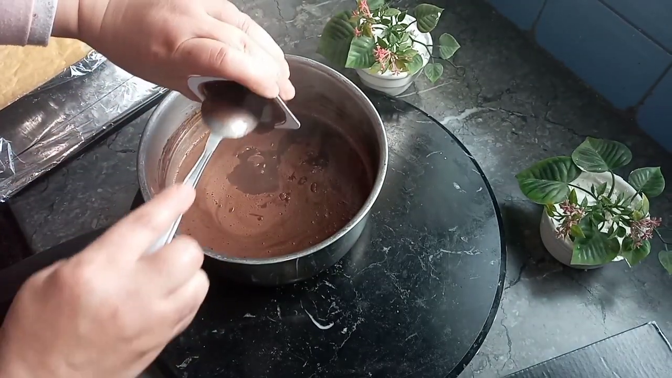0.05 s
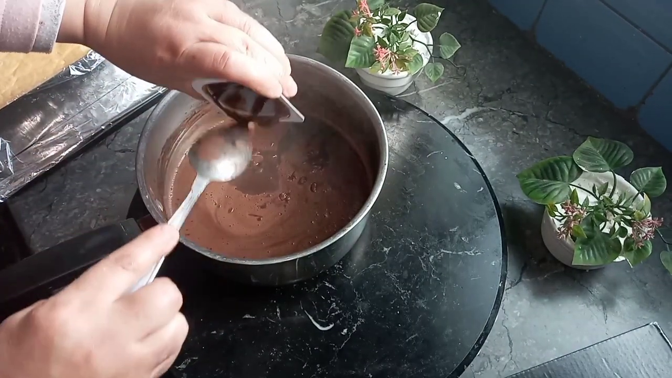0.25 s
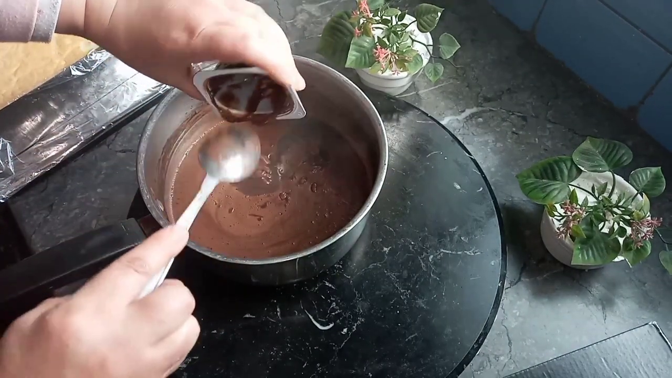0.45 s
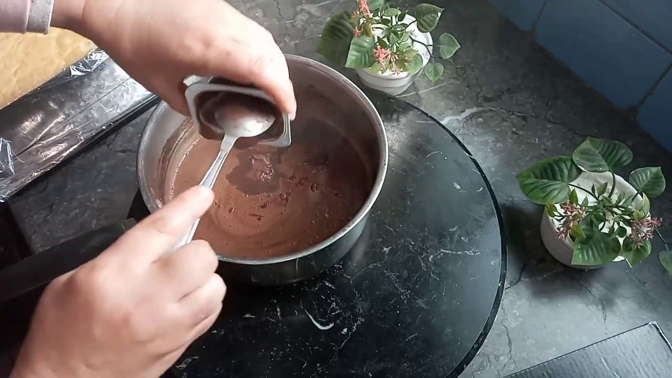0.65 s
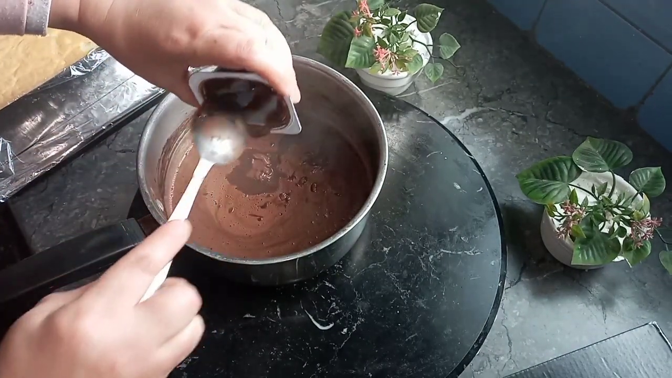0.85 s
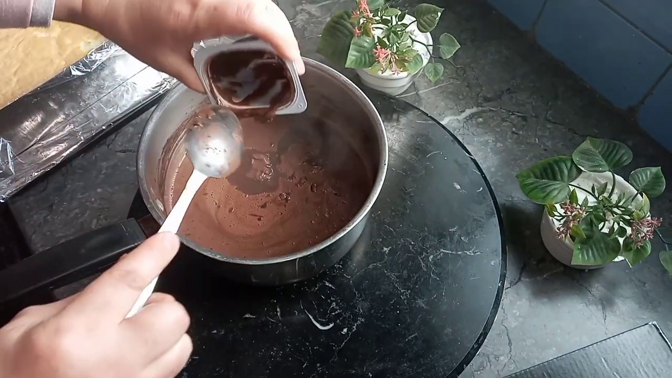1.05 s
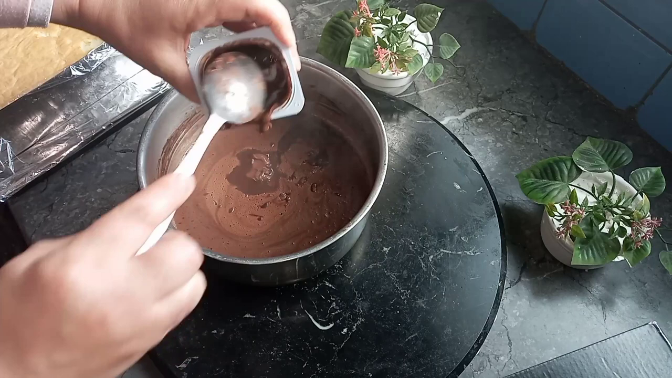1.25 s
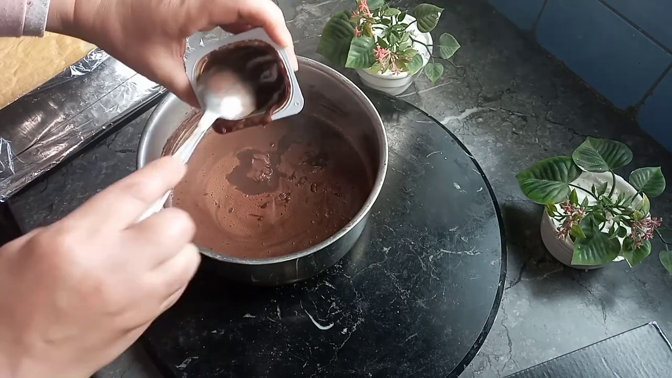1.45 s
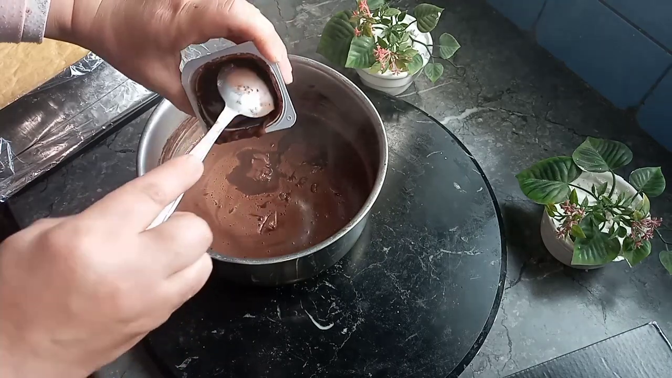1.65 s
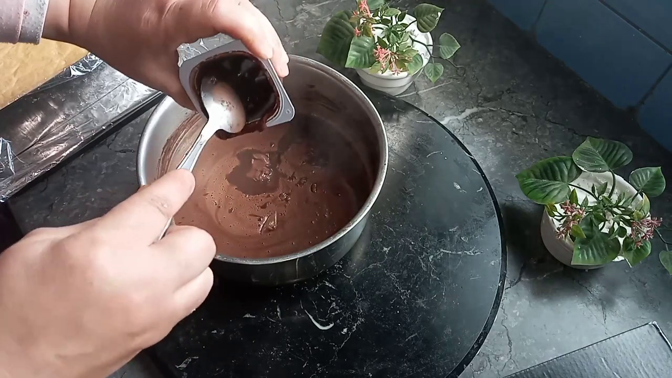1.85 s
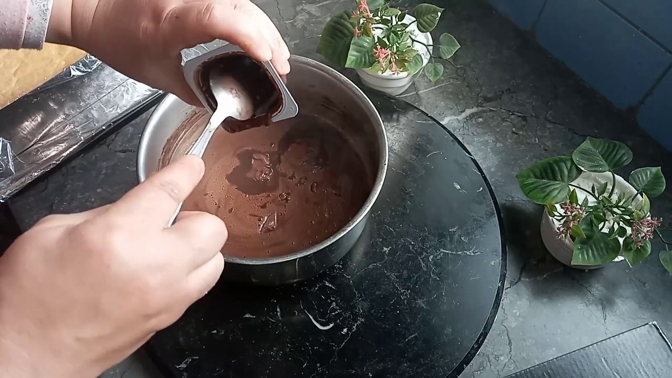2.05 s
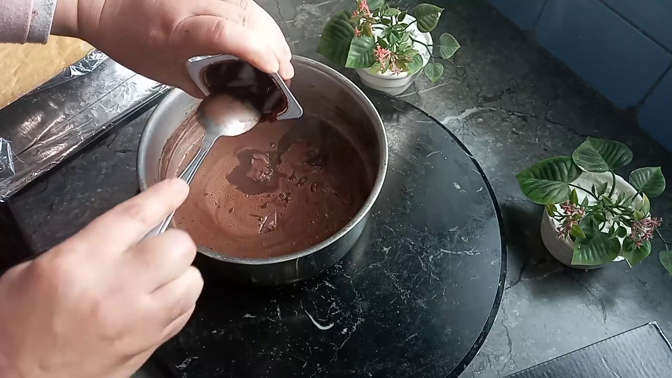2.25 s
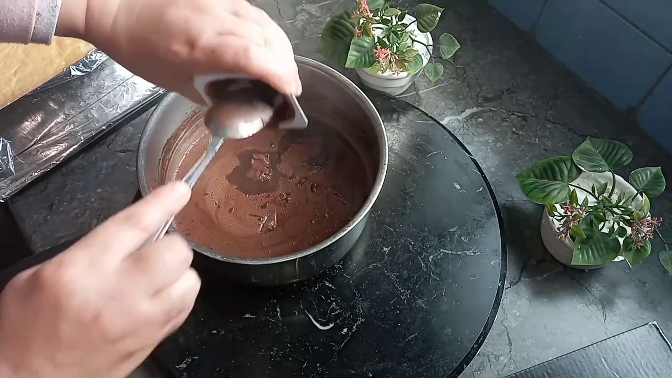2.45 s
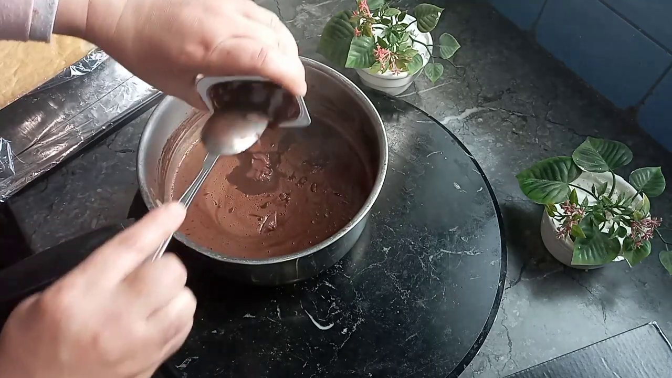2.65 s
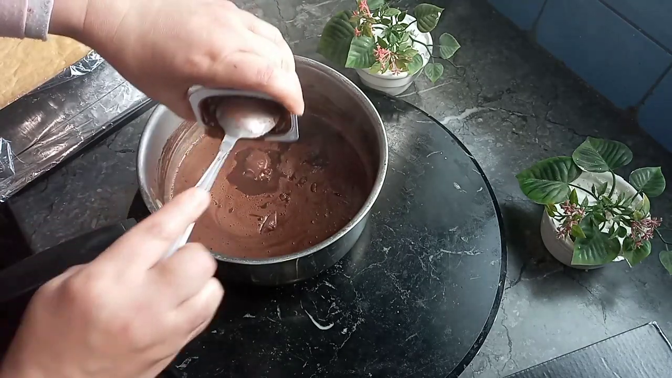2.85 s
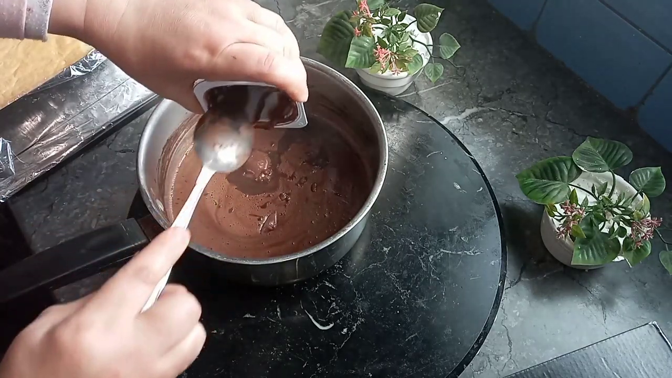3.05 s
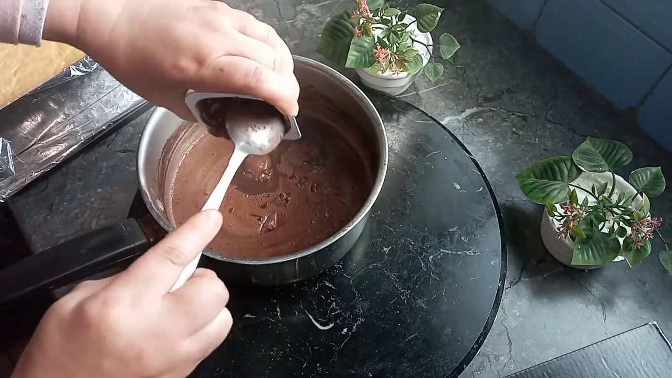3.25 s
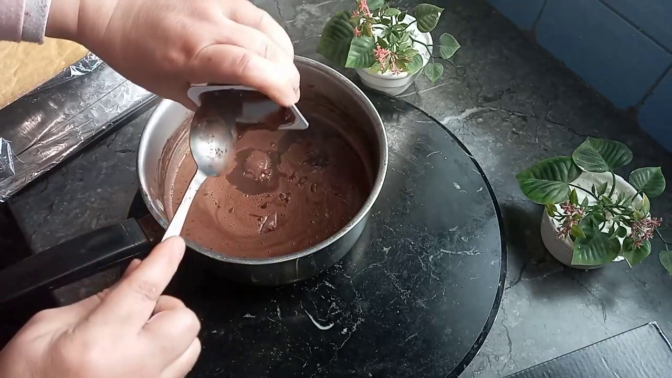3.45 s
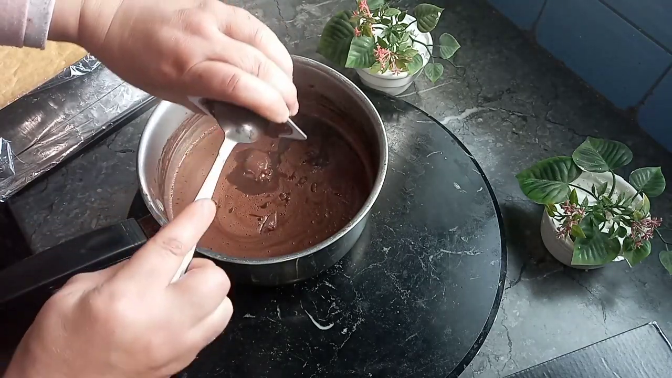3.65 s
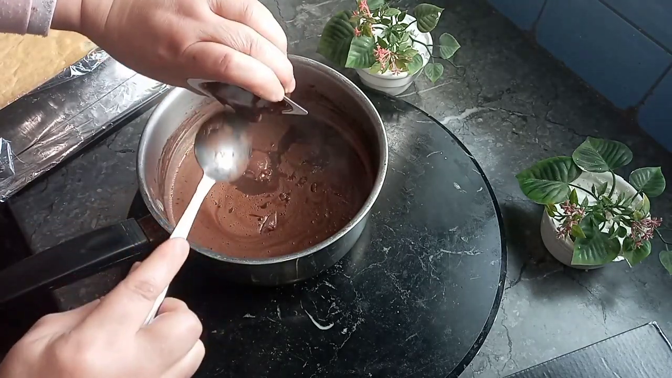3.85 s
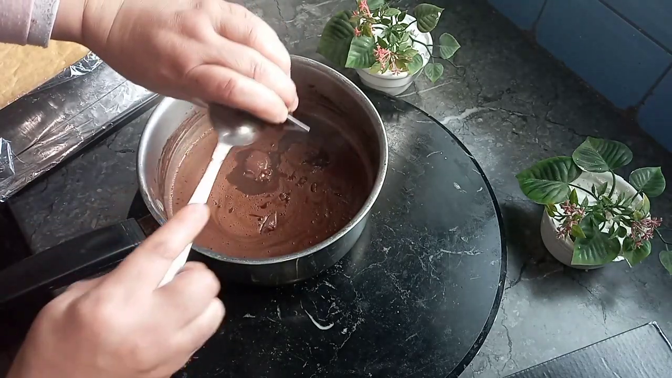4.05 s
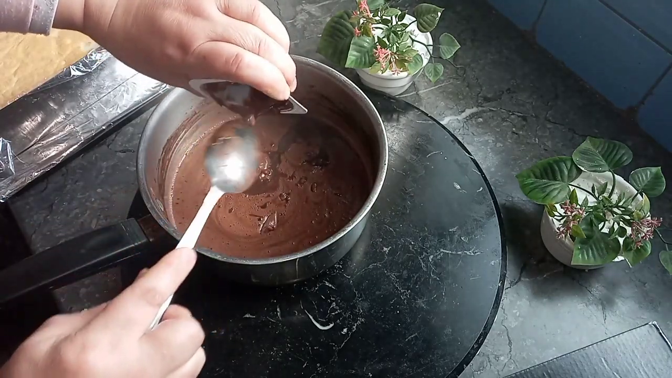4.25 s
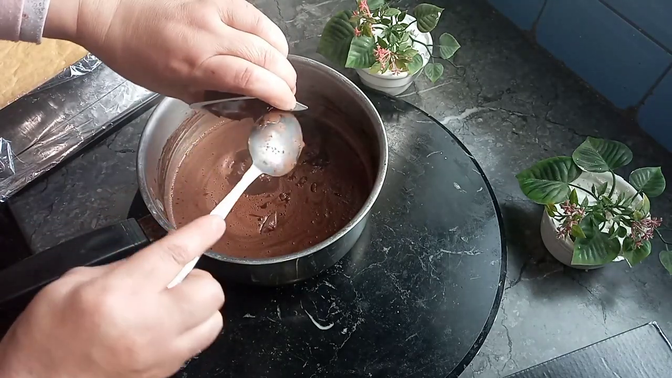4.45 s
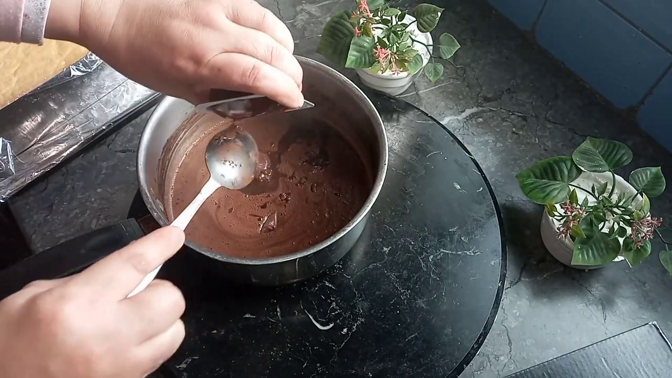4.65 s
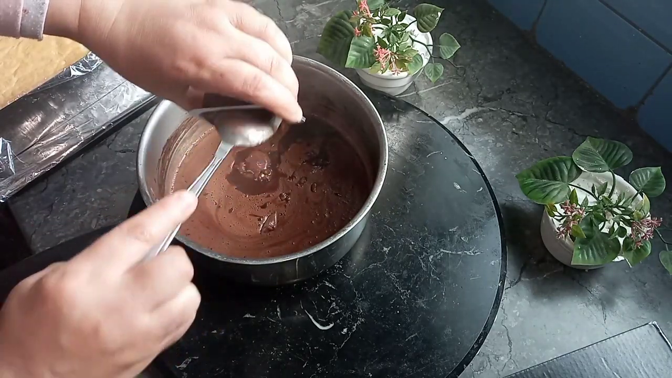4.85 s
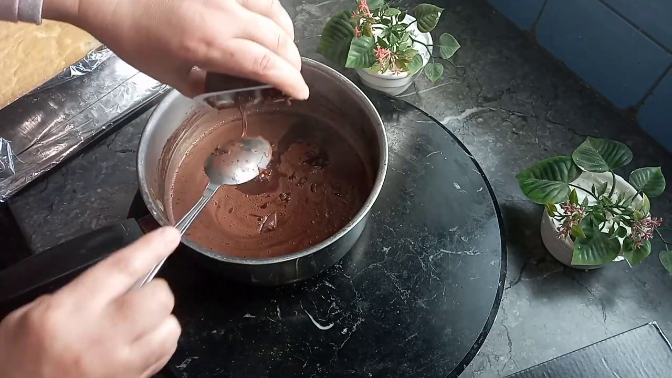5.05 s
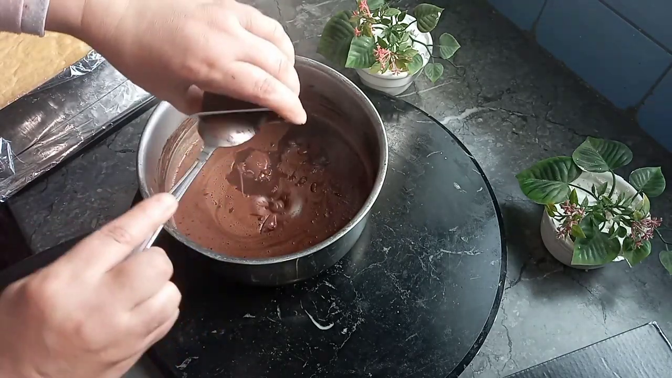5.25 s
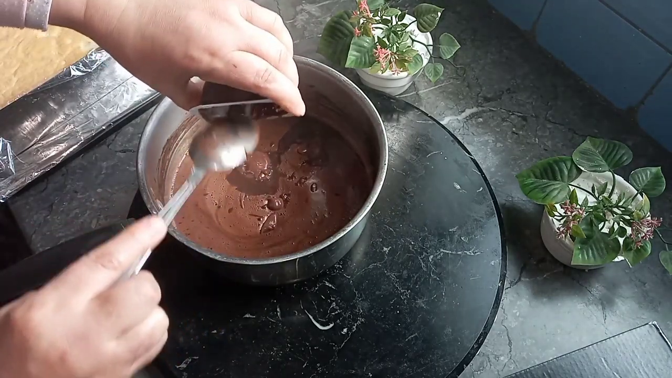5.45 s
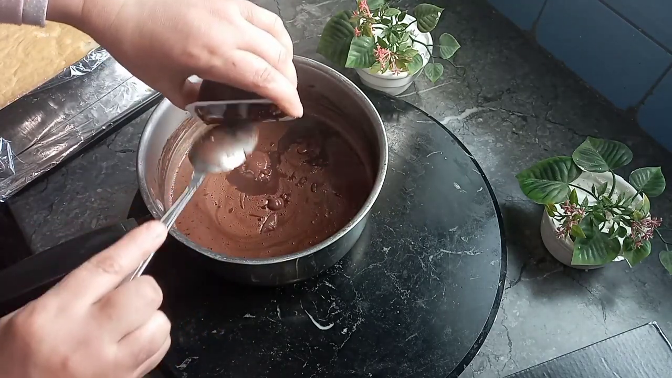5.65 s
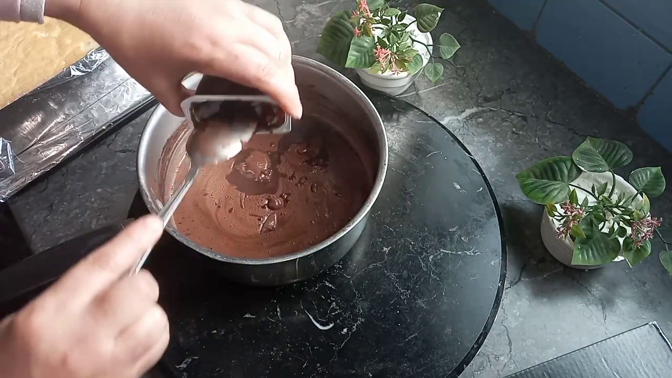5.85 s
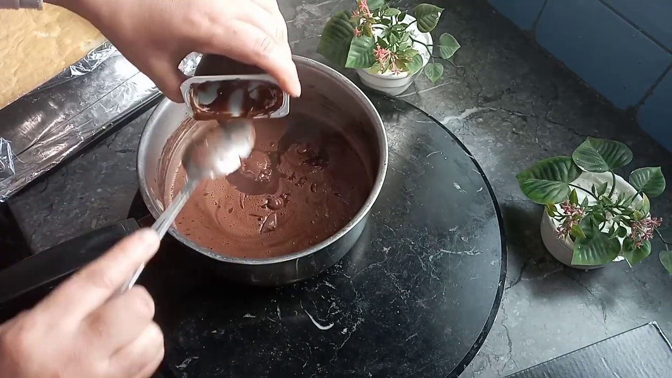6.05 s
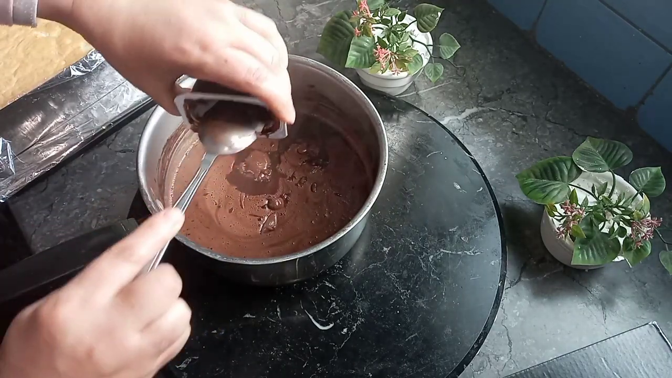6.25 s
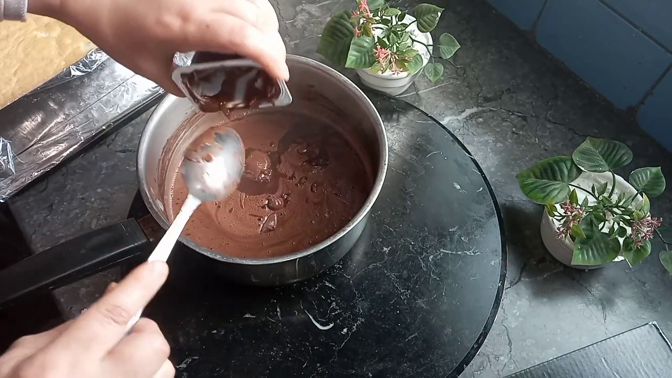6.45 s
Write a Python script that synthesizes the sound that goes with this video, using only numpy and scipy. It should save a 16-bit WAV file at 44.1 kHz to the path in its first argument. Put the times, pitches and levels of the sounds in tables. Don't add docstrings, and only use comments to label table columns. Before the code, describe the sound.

A metal spoon scrapes pudding from a thin plastic cup held over a steel saucepan. Sparse clacks and rasps come first, then a nearly quiet gap, then busier bursts of hollow knocks and short gritty drags. The pan rings faintly in sympathy and sizzles softly. Close stereo microphones in a small tiled kitchen catch short reflections, low rumble and slight hiss.

```python
import sys
import numpy as np
from scipy import signal
from scipy.fft import rfft, irfft, next_fast_len
from scipy.io import wavfile
from scipy.ndimage import uniform_filter1d, map_coordinates

SR = 44100
rng = np.random.default_rng(int(sys.argv[2]) if len(sys.argv) > 2 else 0)


def dump(signal):
    limited = np.clip(np.atleast_2d(signal).T, -1, 1)
    pcm = np.round(limited * 32767).astype(np.int16)
    wavfile.write(sys.argv[1], SR, pcm)


def decibels_to_gain(level_db):
    exponent = np.asarray(level_db, float) / 20
    return 10 ** exponent


N = 287091


def unit(x):
    return x / np.sqrt(np.mean(x ** 2) + 1e-20)


def along(points, hz):
    f, v = np.transpose(points)
    return np.interp(np.log(hz + 1), np.log(f + 1), v)


def curves(rows):
    s, *cols = np.transpose(rows)
    return [np.interp(np.arange(N) / SR, s, c) for c in cols]


def bell(t, s, spread_s):
    return np.exp(-.5 * ((t - s) / spread_s) ** 2)


def filtered(x, response):
    n = x.shape[-1]
    m = next_fast_len(n + 8192)
    return irfft(rfft(x, m) * response(np.fft.rfftfreq(m, 1 / SR)), m)[..., :n]


def resonant(modes):
    def response(f):
        total = 0
        for k, (centre, width, db) in enumerate(modes):
            loss = 1j * f * width
            total = total + (-1) ** k * decibels_to_gain(db) * loss / (centre ** 2 - f * f + loss)
        return total
    return response


def coloured(x, spectrum):
    return unit(filtered(x, lambda hz: decibels_to_gain(along(spectrum, hz))))


def wobble(knots_per_s):
    knots = rng.standard_normal(int(N * knots_per_s / SR) + 4)
    return map_coordinates(knots, [np.arange(N) * knots_per_s / SR])


def grit(rough_db, alike, patchy_db):
    shared, *own = rng.standard_normal((3, N))
    mixed = np.sqrt(alike) * shared + np.sqrt(1 - alike) * np.array(own)
    z = signal.stft(mixed, nperseg=512)[2]
    patches = uniform_filter1d(rng.standard_normal(z.shape[1:]), size=4, axis=0)
    patches = uniform_filter1d(patches, size=6, axis=1)
    slips = decibels_to_gain(rough_db * (wobble(60) + 0.11 * wobble(400)))
    return slips * signal.istft(z * decibels_to_gain(patchy_db * unit(patches)), nperseg=512)[1][:, :N]


def note(hz, t60, rise_s, t):
    x = np.sin(2 * np.pi * (hz * t + rng.random())) * (1 - np.exp(-t / rise_s)) ** 2 * decibels_to_gain(-60 * t / t60)
    return x / np.abs(x).max()


# (frequency [Hz], width [Hz], level [dB])
CUP_MODES = [(970, 37, -21), (1137, 87, 1.5), (1326, 230, 1.5), (1523, 165, 2), (1700, 200, -3),
             (1916, 300, 0)]
# (frequency [Hz], density [dB per Hz])
RASP_SPECTRUM = [(1290, -26), (2200, -5.5), (2790, -7), (3160, -8), (5610, -9), (6750, -5.5), (10600, -15),
                 (13600, -26), (14900, -17), (15550, -20.5), (15800, -59.5), (16500, -69.5)]
# (time [s], level [dB])
DRYNESS_CURVE = [(0, 5), (.25, 11), (.7, 3), (1.4, 4), (2, 2.5), (2.3, 9), (2.8, 2), (3.4, -1.5),
                 (3.75, 6.5), (4.1, 11.5), (4.45, -1), (4.9, -9.5), (5.25, 4), (5.6, 3), (6.2, 3.5),
                 (6.51, 6)]
# (time [s], spread [s], body [dB], rasp [dB], hollow note [dB])
JUDDER_EVENTS = [(1.424, 0.016, -41.5, -40.5, -44), (1.752, 0.0081, -54, -36, -36.5),
                 (2.035, 0.017, -42.5, -36.5, -39.5), (2.157, 0.0073, -73, -64, -56.5),
                 (2.298, 0.027, -53, -54, -63.5), (4.14, 0.008, -40.5, -54, -73),
                 (4.57, 0.0055, -47, -34, -69.5), (0.401, 0.033, -76, -73.5, -92),
                 (2.66, 0.047, -70, -48.5, -59), (0.201, 0.021, -52, -53.5, -80.5),
                 (4.845, 0.012, -68, -51, -84), (4.999, 0.022, -40.5, -43.5, -63),
                 (1.45, 0.014, -50, -56, -47.5), (1.737, 0.0031, -51, -40, -65),
                 (4.56, 0.0064, -46, -48, -72), (6.275, 0.0061, -38.5, -48, -58),
                 (6.353, .005, -33, -53, -56)]


def rubbing():
    t = np.arange(N) / SR
    coarse_t = t[::32]
    body_gain, rasp_gain, base_gain = [np.interp(t, coarse_t, g) for g in pressure_of(coarse_t)]
    pressure = np.array([decibels_to_gain(7.5) * body_gain, decibels_to_gain(10.5) * rasp_gain, 0 * t])
    for s, spread_s, *db in JUDDER_EVENTS:
        pressure = pressure + decibels_to_gain(db)[:, None] * bell(t, s, spread_s)

    body = ticks(depth=1.0) * grit(rough_db=2.0, alike=0.18, patchy_db=2.5)
    body = filtered(body, resonant(CUP_MODES))
    body = unit(filtered(body, resonant([(1450, 1400, 0)])))

    rasp = coloured(ticks(depth=0.8) * grit(rough_db=1.63, alike=0.069, patchy_db=2.5), RASP_SPECTRUM)
    air = filtered(rasp, lambda hz: 1 / (1 + (10500 / (hz + 1)) ** 8))
    rasp = rasp + (decibels_to_gain(*curves(DRYNESS_CURVE)) - 1) * air

    rub = grit(rough_db=2.5, alike=0.62, patchy_db=2.5)
    hollow = filtered(rub, resonant([(800, 230, 0)]))
    hollow = unit(filtered(hollow, resonant([(840, 380, 0)])))
    base = filtered(rub, resonant([(578, 45, 0)]))
    base = unit(filtered(base, resonant([(578, 300, 0)])))
    return pressure[0] * body + pressure[1] * rasp + pressure[2] * hollow + decibels_to_gain(12.5) * base_gain * base


# (time [s], length [s], body [dB], rasp [dB], base note [dB])
DRAG_EVENTS = [(0.0, 0.14, -54.5, -57.5, -64), (0.637, 0.1, -51.5, -50.5, -85),
               (0.8, 0.15, -48.5, -57, -91.5), (1.301, 0.049, -62, -59, -86),
               (1.653, 0.23, -60, -56.5, -82), (1.937, 0.47, -61.5, -58.5, -86),
               (2.5, 0.096, -51.5, -52, -72), (2.845, 0.13, -50.5, -49, -70.5),
               (2.992, 0.092, -45, -52, -79.5), (3.212, 0.065, -46.5, -48.5, -59.5),
               (3.333, 0.1, -53, -52, -62.5), (3.585, 0.16, -79, -59, -66), (3.99, 0.052, -79, -61.5, -73),
               (4.352, 0.21, -53, -57.5, -63.5), (4.86, 0.077, -42, -51, -61.5),
               (5.19, 0.18, -51.5, -55.5, -61), (5.503, 0.16, -53, -53, -64.5),
               (5.794, 0.14, -49.5, -51, -61), (6.184, 0.15, -50.5, -54, -86)]
# (peak time [s], swell [s], body [dB], rasp [dB], base note [dB])
PUSH_EVENTS = [(.52, 0.28, -82, -81.5, -99), (.78, 0.29, -76, -83, -88),
               (0.927, 0.17, -64.5, -64.5, -100.5), (1.468, 0.028, -44, -47.5, -64),
               (1.771, 0.012, -73, -52.5, -86), (2.259, 0.16, -58.5, -65.5, -88),
               (2.638, 0.026, -48, -66, -69.5), (3.455, 0.25, -54.5, -52.5, -86),
               (3.758, 0.16, -46.5, -56, -62.5), (3.815, 0.14, -72, -59, -97),
               (4.106, 0.13, -48.5, -52, -68), (4.587, 0.17, -68.5, -54, -62),
               (5.331, 0.023, -56.5, -64, -79), (5.925, 0.02, -70, -65, -95.5),
               (6.331, 0.059, -86, -69.5, -72)]
GRIP_S, SWELL_DB = 0.00072, 28
EASE_DB_PER_S, LIFT_DB_PER_S, LET_GO_DB_PER_S = (15, 27, 46.5), (299.5, 386, 301), (218, 235, 180)


def pressure_of(t):
    ease, lift, let_go = (np.array(r)[:, None] for r in (EASE_DB_PER_S, LIFT_DB_PER_S, LET_GO_DB_PER_S))
    gain = 0
    knock_s = np.array([0] + [row[0] for row in FLAT_KNOCKS + SLANT_KNOCKS + TIP_KNOCKS])
    for near_s, length_s, *db in DRAG_EVENTS:
        s = knock_s[np.abs(knock_s - near_s).argmin()]
        fall_db = ease * np.clip(t - s, 0, length_s) + lift * np.maximum(t - s - length_s, 0)
        grip = np.clip((t - s) / GRIP_S + (s == 0), 0, 1)
        gain = gain + decibels_to_gain(np.array(db)[:, None] - fall_db) * grip
    for s, swell_s, *db in PUSH_EVENTS:
        fall_db = SWELL_DB * np.maximum(s - t, 0) / swell_s + let_go * np.maximum(t - s, 0)
        gain = gain + decibels_to_gain(np.array(db)[:, None] - fall_db)
    return gain


def ticks(depth):
    ticks_per_s, tick_s = 260, .0012
    when, height = rng.random((2, N))
    jumps = (when < ticks_per_s / SR) * height
    return 1 + depth * signal.lfilter([1], [1, -np.exp(-1 / (tick_s * SR))], jumps)


def knocks():
    out, t = np.zeros((2, N + SR)), np.arange(4096) / SR
    spoon_knocks(out, t)
    base_knocks(out, t)
    film_snaps(out, t)
    return filtered(out[:, :N], lambda hz: (1j * hz / (1j * hz + 200)) ** 3)


# (time [s], peak [dB], wall note [Hz], upper notes [dB], crack [dB])
FLAT_KNOCKS = [(0.6424, -21, 1720, 2.5, 1.5), (0.6849, -31, 1896, 8, 0.5), (1.3109, -39, 1700, -13, 0.5),
               (1.3389, -39.5, 1630, 5, 10), (2.6071, -25.5, 1350, -8.5, -7.5),
               (2.953, -27.5, 1220, -1.5, -7), (3.28, -18.5, 1470, -8.5, -9),
               (3.6114, -24.5, 2150, -0.5, 0), (3.687, -28.5, 1400, -24, -7),
               (4.8747, -16.5, 1760, 0, -7.5), (5.2697, -20.5, 1540, -6.5, 2),
               (5.9403, -31, 1566, -7.5, -6), (6.2695, -31, 1640, -1, -7),
               (6.3524, -32.5, 1700, -8.5, -13.5)]
SLANT_KNOCKS = [(0.0872, -17, 1387, -11.5, -12), (0.789, -14.5, 1690, -10.5, -44.5),
                (0.862, -17, 1437, -8, -15.5), (1.476, -26, 1700, 6.5, 2), (1.6747, -30, 1360, 0, 5),
                (1.936, -43, 1470, 11, 11), (1.968, -30.5, 1450, -4, 1), (2.2741, -29, 1330, -13, -14.5),
                (2.843, -22, 1546, -1, -38), (2.9906, -10.5, 1190, -22.5, -7),
                (3.2216, -25.5, 2010, 1.5, 7), (3.3365, -18.5, 1860, -2, -6.5),
                (3.3809, -19.5, 1694, -19, 4), (5.0063, -32, 1507, -2.5, -8.5), (5.1978, -21, 1700, -2, 2),
                (5.5686, -17, 1450, -9, -6), (5.7925, -22.5, 1530, -13, 6),
                (5.8243, -19.5, 1450, -13, -3.5), (6.2004, -16.5, 1567, -6, -8)]
TIP_KNOCKS = [(0.517, -76.5, 2000, 4, 11.5), (0.8746, -21, 1450, -13, -1), (1.2977, -54, 1850, -2, -23),
              (1.6545, -42, 1700, 1.5, 18), (1.744, -17.5, 1470, -6.5, -20),
              (1.769, -21.5, 1610, -0.5, -0.5), (1.962, -41, 1730, 5.5, -19), (2.0139, -26, 1680, -22, -26),
              (2.5029, -17.5, 1440, -5.5, -4.5), (2.8553, -34, 1590, 3.5, 2.5), (2.8907, -20, 1660, -1, -3),
              (3.3993, -25.5, 1390, -12, 5), (3.5816, -27.5, 1450, -8, -12.5), (3.987, -19, 1370, -14, -18),
              (4.362, -18, 1450, -0.5, -7), (4.87, -26.5, 1470, 7.5, -15.5), (5.505, -17, 1580, -2.5, -2.5)]
# (frequency [Hz], density [dB per Hz])
CRACK_SPECTRUM = [(2650, -24.5), (4500, -13), (5690, -9), (7920, -9), (9530, -19.5), (11000, -13),
                  (12500, -33.5), (15100, -18), (15800, -22), (16500, -30)]


def spoon_knocks(out, t):
    wall_t60, snap = 0.011, 7.1
    for rows, lower_db in ((FLAT_KNOCKS, 1), (SLANT_KNOCKS, -3), (TIP_KNOCKS, -36.5)):
        for s, db, wall_hz, upper_db, crack_db in rows:
            contact = rng.standard_normal((2, len(t))) * t / .0013 * np.exp(1 - t / 0.0013)
            contact[1, 60] += snap
            near = rng.uniform(-0.49, 1, 2)
            wall = note(wall_hz, wall_t60, .001, t)
            wall = wall + .35 * note(1550 + 250 * near[0], wall_t60, .001, t)
            lower = note(1150 + 70 * near[1], 0.022, 0.00099, t)
            upper = coloured(contact[0], [(2000, -17.0), (2500, -1.0), (4800, -8.5), (6000, -31.0)])
            crack = coloured(contact[1], CRACK_SPECTRUM)
            bright = decibels_to_gain(upper_db - 1.5) * upper / np.abs(upper).max()
            bright = bright + decibels_to_gain(crack_db + 6.0) * crack / np.abs(crack).max()
            blow = decibels_to_gain(db + 2.5) * (wall + decibels_to_gain(lower_db - 5.0) * lower + bright)
            add(out, s, blow + rim(s, t))


# (time [s], peak [dB], note [Hz], overtone [Hz], overtone level [dB])
RIM_RINGS = [(0.0882, -32.5, 2940, 3440, 7), (0.6434, -27.5, 3160, 3780, 6), (0.6868, -36, 2770, 4090, 1),
             (0.7906, -18.5, 2910, 3780, -11), (0.8614, -22.5, 2150, 3690, -3),
             (0.8754, -34, 2980, 4500, -7.5), (1.3399, -31.5, 2990, 3780, -11.5),
             (1.4785, -27, 3200, 3930, 4.5), (1.6546, -36, 2990, 4460, 6), (1.6756, -20.5, 3170, 3360, -12),
             (1.7689, -22, 2020, 4010, -3.5), (1.9365, -27.5, 2660, 3310, -9), (1.9674, -33, 2540, 3400, 0),
             (2.5027, -21.5, 3100, 3270, 1), (2.8439, -19, 2110, 3800, -11), (2.8544, -26, 3350, 3300, -5),
             (2.8918, -22, 2770, 4000, -15), (2.9911, -28, 2220, 4600, -11),
             (3.2236, -21.5, 2990, 4420, -1), (3.2809, -30, 2280, 4100, -6),
             (3.3344, -7.5, 2750, 3610, -10), (3.3804, -24, 2610, 3750, -4),
             (3.6122, -19.5, 2324, 4900, -8), (3.9883, -34, 2730, 3670, -7), (4.363, -23, 2850, 3710, -0.5),
             (4.8753, -20, 2280, 3790, -2), (5.1981, -16.5, 2570, 4520, -5.5),
             (5.2704, -25, 2320, 3860, -12), (5.5049, -14.5, 2657, 3695, -8),
             (5.5697, -25.5, 2410, 3850, -13), (5.7927, -22.5, 2660, 3590, 1),
             (5.8237, -23.5, 2220, 4980, 1), (6.2013, -27, 3040, 3780, -5), (6.2684, -38, 2220, 3920, -3)]


def rim(s, t):
    rim_t60, rim_db = .012, -4
    at, db, hz, over_hz, over_db = min(RIM_RINGS, key=lambda row: abs(row[0] - s))
    if abs(at - s) > .0035:
        return 0
    t = np.maximum(t - (at - s - .001), 0)
    notes = np.sin(2 * np.pi * hz * t) + decibels_to_gain(over_db) * np.sin(2 * np.pi * over_hz * t)
    shape = (1 - np.exp(-t / 0.0017)) ** 2 * decibels_to_gain(-60 * t / rim_t60)
    return decibels_to_gain(db + rim_db) * notes * shape / shape.max()


# (time [s], peak [dB], note [Hz], thud [dB])
BASE_KNOCKS = [(0.087, -32, 864, -13), (0.642, -41, 920, -19), (0.686, -32, 956, -24.5),
               (0.79, -25, 894, -52), (0.859, -35, 840, -16), (1.339, -33.5, 800, -6),
               (1.674, -44.5, 585, -7), (1.767, -32.5, 863, -21), (2.011, -44, 820, -35),
               (2.045, -42.5, 796, 1), (2.525, -35.5, 592, -9.5), (2.842, -51, 1060, -3),
               (2.89, -36, 645, -27), (3.222, -29.5, 950, -28), (3.335, -27.5, 878, -49),
               (3.61, -29, 597, -19), (3.987, -35.5, 713, -25.5), (4.361, -34, 557, -33),
               (4.873, -24.5, 1104, -59), (5.004, -40, 572, -38), (5.199, -32, 576, -50),
               (5.269, -27.5, 1050, -30), (5.507, -27, 565, -25), (5.823, -26, 916, -18.5)]


def base_knocks(out, t):
    for s, db, hz, thud_db in BASE_KNOCKS:
        thud = decibels_to_gain(thud_db + 12.0) * note(rng.uniform(260, 344), 0.059, 0.00014, t)
        base = note(hz, 0.023 * (900 / hz) ** 3.5, 0.00031, t)
        add(out, s, decibels_to_gain(db + 2.0) * (base + thud))


# (time [s], peak [dB], centre [Hz])
FILM_SNAPS = [
    (0.221, -51, 5000),
    (.362, -52, 8200),
    (.519, -53.5, 10360),
    (1.15, -63.5, 10800),
]


def film_snaps(out, t):
    for s, db, hz in FILM_SNAPS:
        puff = rng.standard_normal(len(t)) * np.exp(-t / .0015)
        add(out, s, decibels_to_gain(db) * filtered(puff, resonant([(hz, 0.22 * hz, 6)])))


def add(out, s, blow):
    echo_db = -5
    tail = echo(decibels_to_gain(echo_db) * blow[:1024] * np.exp(-np.arange(1024) / SR / .003))
    at, late = round(s * SR), rng.integers(-1, 2)
    out[0, at + late:][:len(blow)] += blow
    out[1, at:][:len(blow)] += blow
    out[:, at:][:, :tail.shape[1]] += tail


# (frequency [Hz], t60 [s])
KITCHEN_T60 = [(300, 0.32), (1000, 0.23), (1480, 0.23), (2100, 0.26), (4000, 0.25), (12000, 0.015)]


def echo(x):
    hz, t, z = signal.stft(rng.standard_normal((2, SR // 4)), SR, nperseg=256)
    decay = decibels_to_gain(-60 * t / along(KITCHEN_T60, hz)[:, None])
    tail = signal.istft(z * decay, SR, nperseg=256)[1]
    return signal.fftconvolve(np.pad(x, (180, 0))[None], tail / np.linalg.norm(tail[0]), axes=1)


# (time [s], peak [dB], note [Hz], grit [dB])
NICK_EVENTS = [(.218, -42, 1360, -3.5), (1.388, -47, 1490, 6), (2.153, -47, 1470, -6),
               (2.21, -42, 1640, -8), (2.301, -34, 1310, -9.5), (2.4, -46, 1420, -8),
               (2.594, -42.5, 1700, 8.5), (2.6, -33.5, 1750, -12), (2.626, -30.5, 1120, -11.5),
               (2.662, -31.5, 1430, -9), (2.878, -40, 1600, 9), (3.75, -37.5, 1540, -7.5),
               (4.063, -36.5, 1520, -7.5), (4.093, -33, 1384, -10), (4.535, -38, 1280, -8.5),
               (4.5547, -36.5, 1900, 2.5), (4.5715, -34, 1830, 2), (2.9912, -14, 1680, -25),
               (.79, -18, 1300, -30), (.7905, -24, 2250, -30), (4.363, -23, 1900, -20),
               (4.876, -19, 1880, -20)]


def nicks():
    out, t = np.zeros(N + SR), np.arange(1024) / SR
    for s, db, hz, grit_db in NICK_EVENTS:
        grain = rng.standard_normal(len(t)) * t / .0008 * np.exp(1 - t / 0.00063)
        grain = coloured(grain, CRACK_SPECTRUM)
        nick = note(hz, 0.015, .0008, t) + decibels_to_gain(grit_db) * grain / np.abs(grain).max()
        out[round(s * SR):][:len(t)] += decibels_to_gain(db) * nick
    return out[:N]


# (time [s], level [dB])
SQUEAL_CURVE = [
    (2.888, -90),
    (2.897, -42),
    (2.95, -42),
    (2.975, -49),
    (2.99, -93),
]


def squeal(hz):
    level_db = curves(SQUEAL_CURVE)[0] + 1.4 * wobble(50)
    return decibels_to_gain(level_db) * np.sin(2 * np.pi * np.cumsum(hz + 6 * wobble(45)) / SR)


# (frequency [Hz], width [Hz], level [dB])
PAN_MODES = [(1120, 14, -3.5), (1216, 6, -2.5), (1330, 26, -5.5), (1377, 14, -6), (1470, 10, 0),
             (1590, 11, -8.5), (1700, 4.7, -10.5), (1905, 5.5, 1), (1930, 20, -5), (2160, 6.4, -2.5),
             (2750, 20, 2.5), (2780, 7.6, -5), (2990, 5.1, -12)]


def pan_ringing(cup):
    return decibels_to_gain(-3) * filtered(cup, resonant(PAN_MODES))


# (time [s], level [dB], pitch [Hz])
PAN_SONG = [(.33, -85, 1600), (.4, -69, 1700), (.46, -75.5, 1950), (.6, -80, 1900), (.7, -90.5, 1900),
            (2.33, -81.5, 1950), (2.36, -52, 1960), (2.43, -69, 1960), (2.47, -90.5, 1960),
            (4.15, -90.5, 1843), (4.2, -76, 1850), (4.26, -67, 1880), (4.33, -59, 2000), (4.7, -64, 1900),
            (4.78, -78.5, 1900), (4.84, -61, 1960), (4.9, -82, 1960)]
# (frequency [Hz], width [Hz], level [dB])
SPOON_MODES = [(2770, 60, -2), (3780, 35, -5), (5150, 50, -4.5), (6640, 44, -3), (8040, 40, -6)]


def songs():
    brush_s, brush_spread_s, brush_db = .44, .055, -73
    t, (db, hz) = np.arange(N) / SR, curves(PAN_SONG)
    turns = 2 * np.pi * np.cumsum(hz) / SR
    pan = decibels_to_gain(db - 2.5) * (wobble(220) * np.sin(turns) + wobble(220) * np.cos(turns))
    bowl = unit(filtered(rng.standard_normal(N), resonant(SPOON_MODES)))
    return pan + decibels_to_gain(brush_db) * bell(t, brush_s, brush_spread_s) * bowl


# (time [s], level [dB])
SIZZLE_CURVE = [(0, -78), (.2, -83), (.43, -94.5), (1.34, -93.5), (1.49, -78), (1.7, -58.5), (2.3, -65.5),
                (2.6, -63.5), (3.17, -64.5), (3.45, -69), (3.62, -63.5), (4.15, -65), (4.48, -68.5),
                (5.1, -67.5), (5.93, -68), (6.25, -69.5), (6.51, -68.5)]
# (frequency [Hz], density [dB per Hz])
SIZZLE_SPECTRUM = [(1470, -75), (2500, -28.5), (5290, -10.5), (5730, -6), (7860, 0.5), (9130, -11),
                   (10700, -4), (12900, -25.5), (15500, -16.5), (15800, -53)]


def sizzle():
    sizzle_db, = curves(SIZZLE_CURVE)
    return decibels_to_gain(sizzle_db + 8.5) * coloured(grit(rough_db=-1.1, alike=0.048, patchy_db=2), SIZZLE_SPECTRUM)


# (frequency [Hz], density [dB per Hz])
RUMBLE_SPECTRUM = [(15, -62.5), (25, -33), (51, -20.5), (156, -7), (203, -18), (257, -10.5), (292, -13.5),
                   (331, -16), (458, -8), (500, -14), (650, -49.5), (1100, -120)]
# (time [s], spread [s], level [dB])
COUNTER_BUMPS = [(0, 0.023, -54.5), (1.49, 0.017, -59), (1.7, 0.047, -72), (1.99, 0.055, -75),
                 (2.53, 0.018, -63), (4.15, 0.027, -73), (2.12, 0.067, -76), (2.75, .03, -86),
                 (4.43, 0.06, -75.5), (5.1, 0.048, -76.5), (6, 0.035, -73), (4.66, 0.04, -69),
                 (5.65, 0.068, -55), (5.82, 0.046, -68)]


def rumble():
    t, shake = np.arange(N) / SR, decibels_to_gain(-75.5)
    for s, spread_s, db in COUNTER_BUMPS:
        shake = shake + decibels_to_gain(db) * bell(t, s, spread_s)
    return decibels_to_gain(4) * shake * coloured(grit(rough_db=.8, alike=.85, patchy_db=3), RUMBLE_SPECTRUM)


# (full from [s], full to [s], pitch [Hz], level [dB])
DRONE_EVENTS = [
    (1.93, 1.982, 219, -52.5),
    (5.612, 5.67, 263.3, -47.5),
    (5.743, 5.8, 267.7, -48),
]


def drones():
    in_db_per_s, out_db_per_s = 347, 298
    t = np.arange(N) / SR
    start, end, drone_hz, full_db = np.transpose(DRONE_EVENTS)[..., None]
    levels = full_db - in_db_per_s * np.maximum(start - t, 0) - out_db_per_s * np.maximum(t - end, 0)
    hz, db = drone_hz[levels.argmax(axis=0), 0], levels.max(axis=0)
    turns = 2 * np.pi * np.cumsum(hz + 8 * wobble(42)) / SR
    hum = 0
    for ratio, level_db in ((1, 0), (.67, -5), (.36, -15), (1.6, -17)):
        hum = hum + decibels_to_gain(2.5 * wobble(40) + level_db) * np.sin(ratio * turns + wobble(35))
    return decibels_to_gain(db) * hum


# (frequency [Hz], density [dB per Hz])
HISS_SPECTRUM = [(240, -49.5), (420, -13.5), (700, -12.5), (4000, -21.5), (11000, -34.5), (13200, -42.5),
                 (14300, -22.5), (15500, -20.5), (15800, -56)]


def hiss():
    return decibels_to_gain(-74.0) * coloured(grit(rough_db=-1.8, alike=0.046, patchy_db=1.0), HISS_SPECTRUM)


def counter_bounce(left):
    delay_s, share, low_hz, high_hz = .00127, .5, 550, 4500

    def response(hz):
        copy = share / (1 + (low_hz / (hz + 1)) ** 4) / (1 + (hz / high_hz) ** 2)
        return (1 + copy * np.exp(-2j * np.pi * hz * delay_s)) / np.sqrt(1 + copy ** 2)
    return filtered(left, response)


def scene():
    lag = 46
    cup = rubbing() + knocks() + nicks()
    background = songs() + sizzle() + rumble() + drones() + hiss()
    left, right = cup + squeal(hz=705) + pan_ringing(cup) + background
    left = counter_bounce(left)
    return np.array([np.roll(left, lag // 2), np.roll(right, -lag // 2)])


def low_pass(x):
    return signal.sosfilt(signal.butter(12, 16660, fs=SR, output="sos"), x)


# (frequency [Hz], gain [dB])
TREBLE_RESPONSE = [(11800, 1.5), (13600, -2), (14500, 0), (15500, 3.5), (15900, -12.5)]
# (frequency [Hz], difference [dB])
MIC_BALANCE = [(120, 5), (330, -1), (560, 3), (800, -2), (1600, 6), (2000, 6.5), (6500, 5.5), (9000, 0),
               (15000, -.5)]


def record(dry):
    top_hz = 16660
    side = np.array([[.5], [-.5]])

    def response(hz):
        return decibels_to_gain(along(TREBLE_RESPONSE, hz) + side * along(MIC_BALANCE, hz)) * (hz < top_hz)
    mics = filtered(dry, response)
    return low_pass(mics)


dry = scene()
out = record(dry)
dump(out)
```